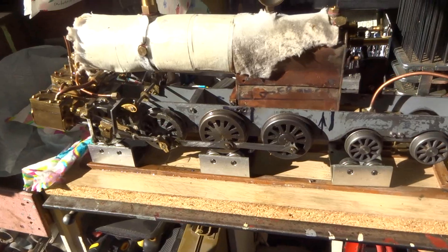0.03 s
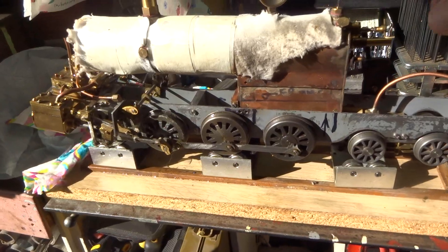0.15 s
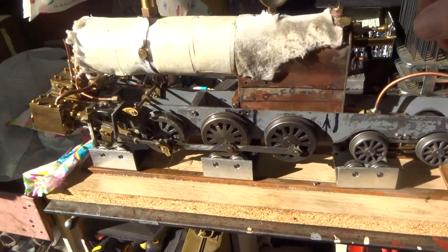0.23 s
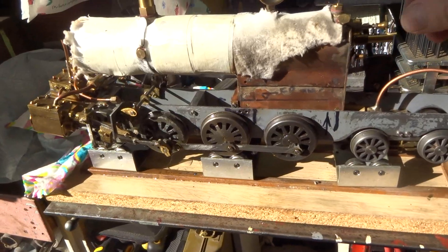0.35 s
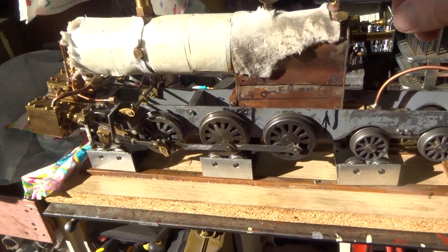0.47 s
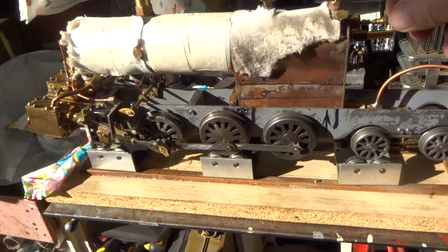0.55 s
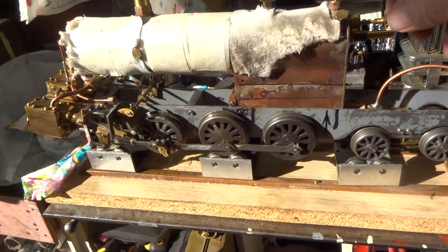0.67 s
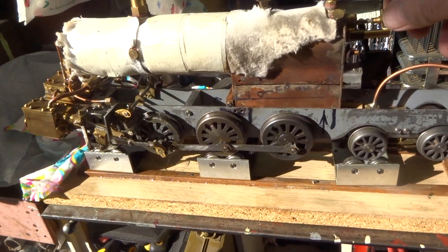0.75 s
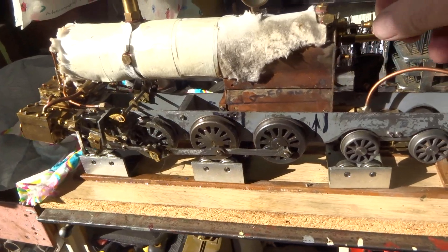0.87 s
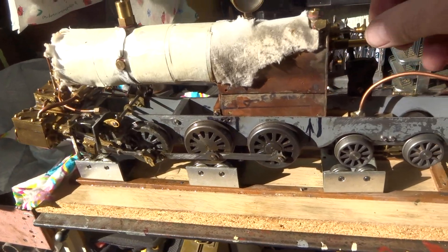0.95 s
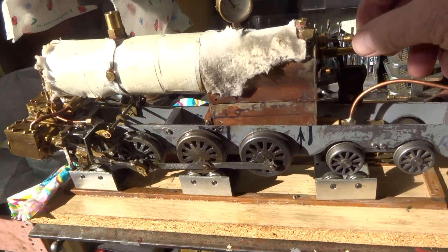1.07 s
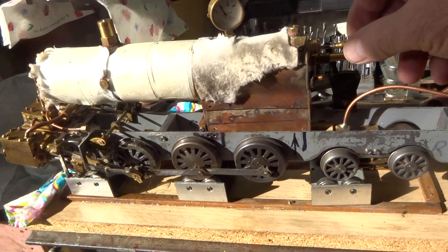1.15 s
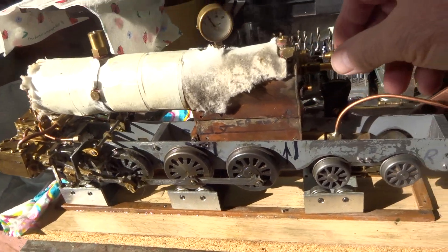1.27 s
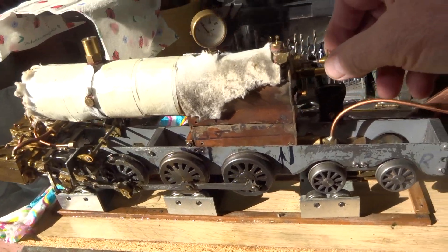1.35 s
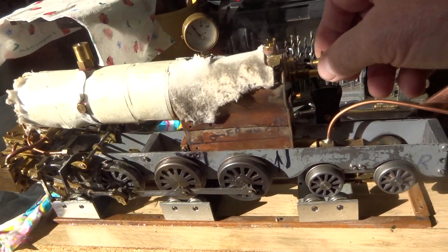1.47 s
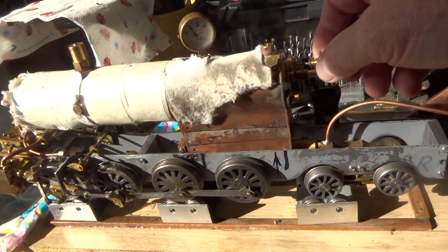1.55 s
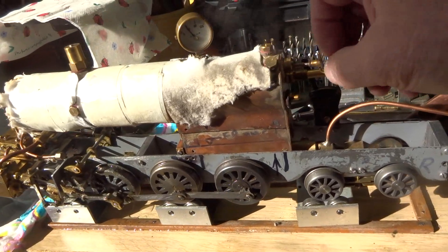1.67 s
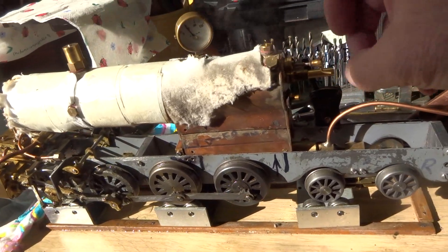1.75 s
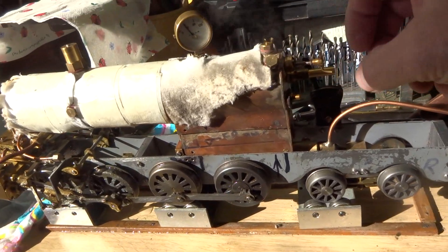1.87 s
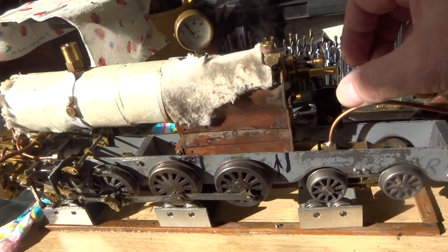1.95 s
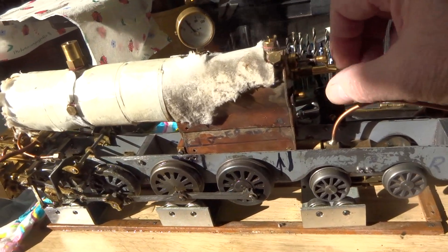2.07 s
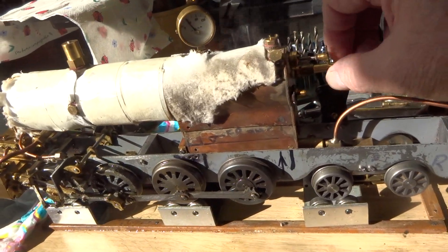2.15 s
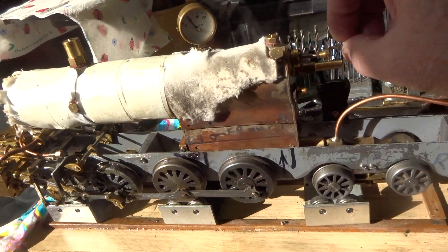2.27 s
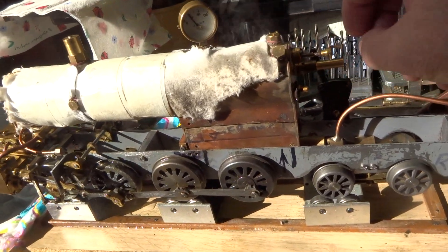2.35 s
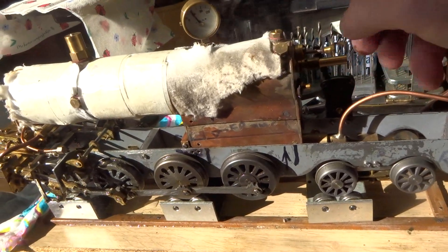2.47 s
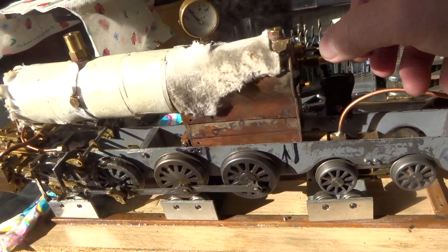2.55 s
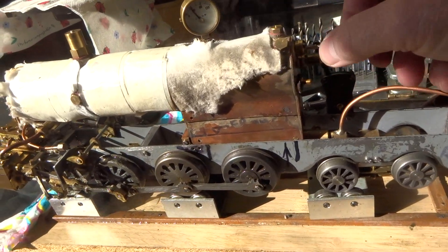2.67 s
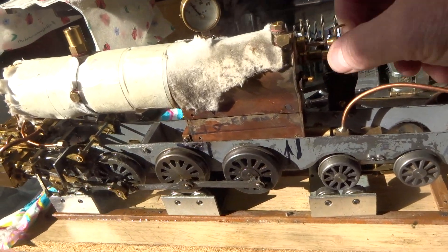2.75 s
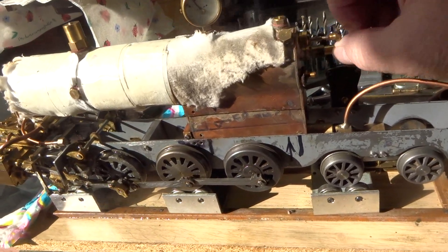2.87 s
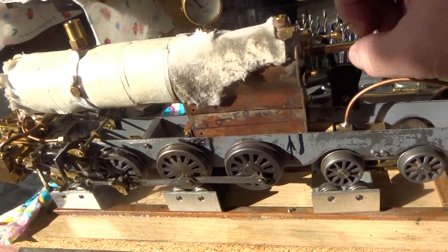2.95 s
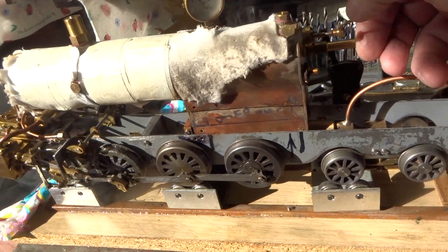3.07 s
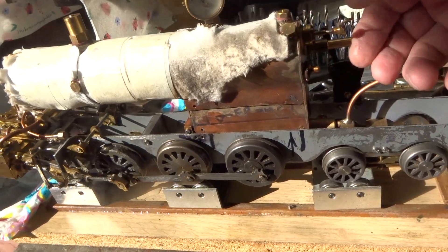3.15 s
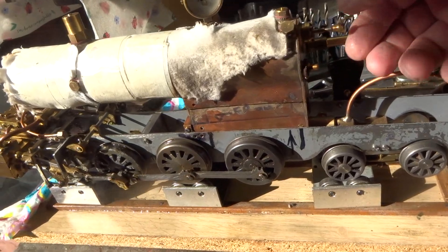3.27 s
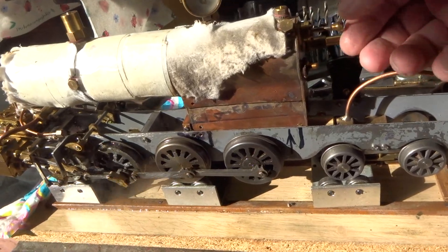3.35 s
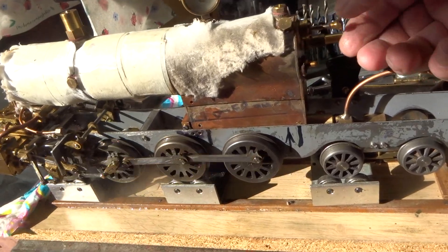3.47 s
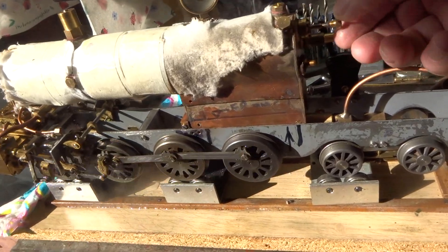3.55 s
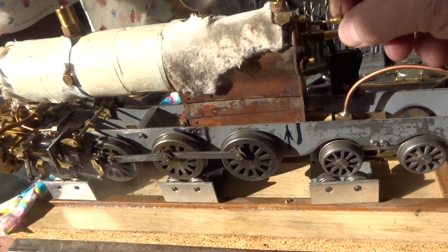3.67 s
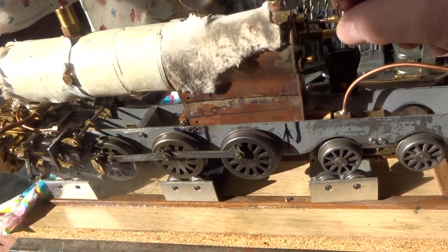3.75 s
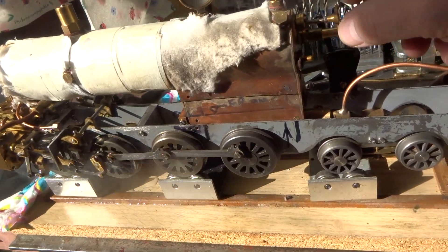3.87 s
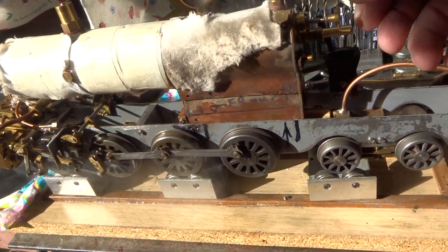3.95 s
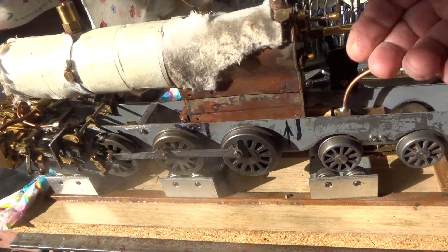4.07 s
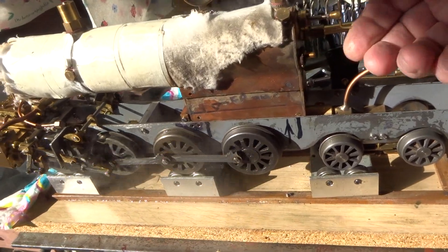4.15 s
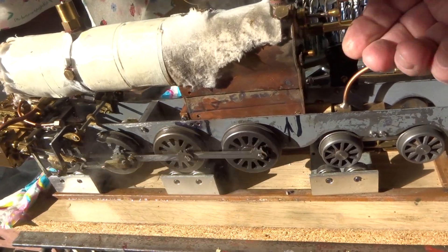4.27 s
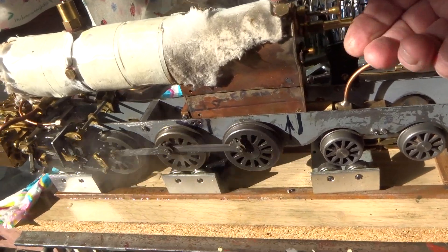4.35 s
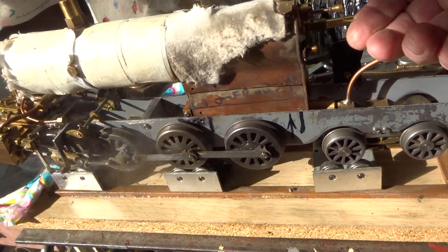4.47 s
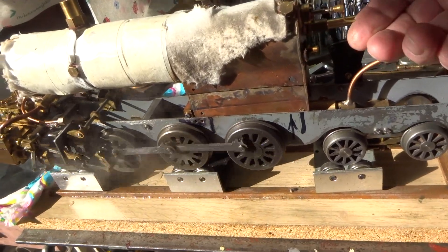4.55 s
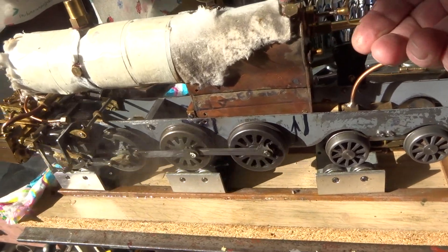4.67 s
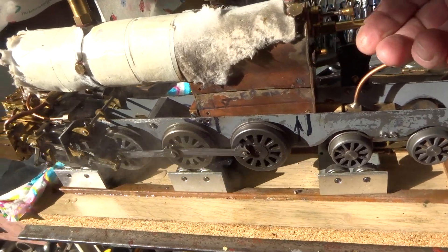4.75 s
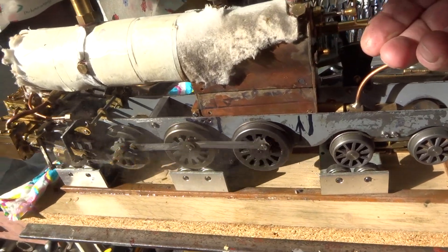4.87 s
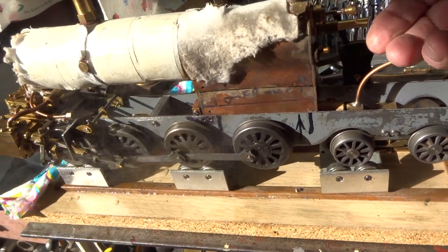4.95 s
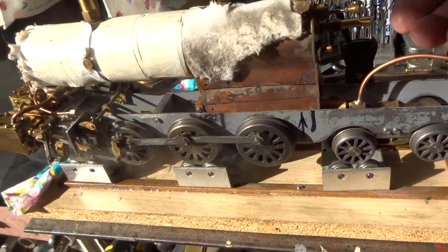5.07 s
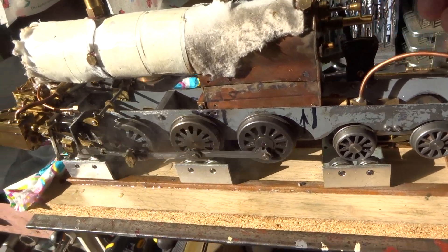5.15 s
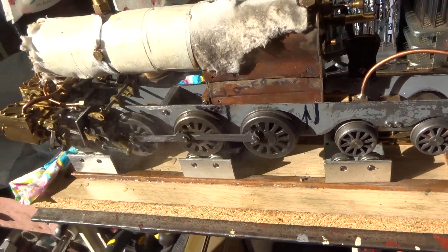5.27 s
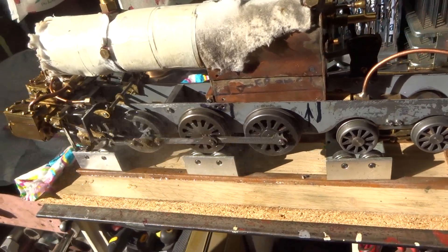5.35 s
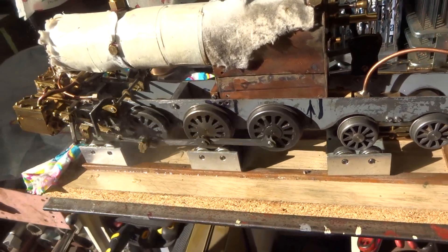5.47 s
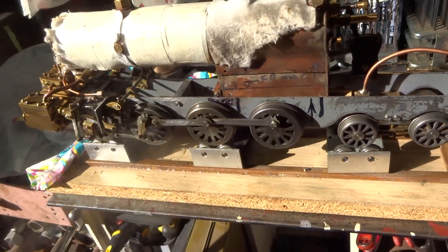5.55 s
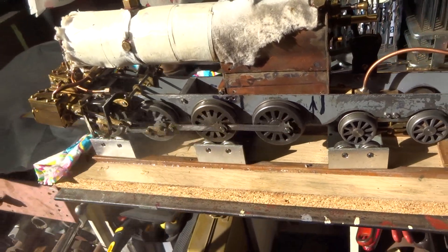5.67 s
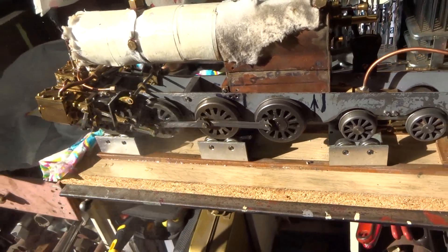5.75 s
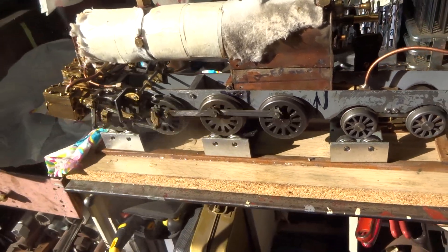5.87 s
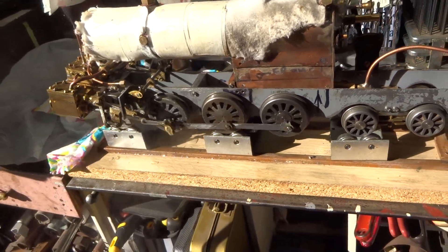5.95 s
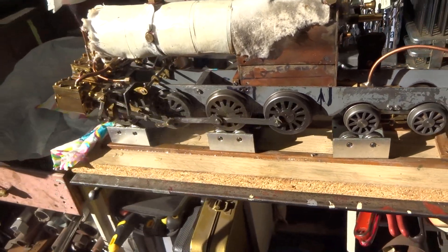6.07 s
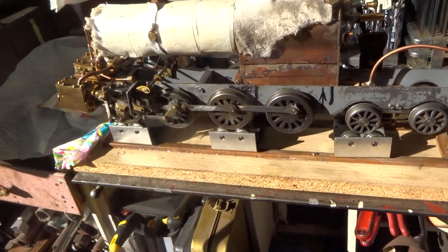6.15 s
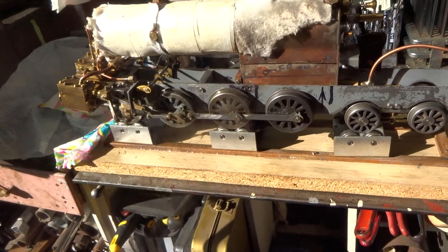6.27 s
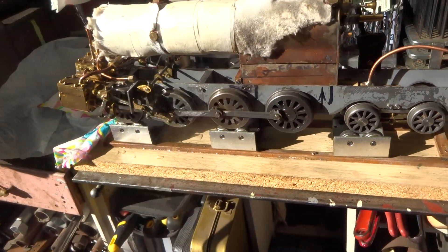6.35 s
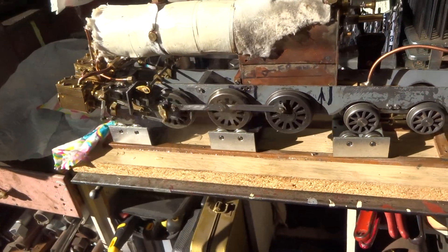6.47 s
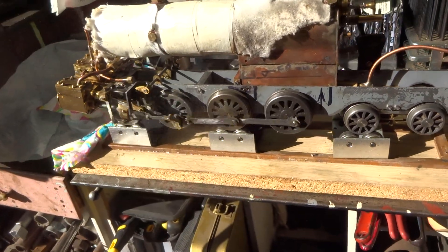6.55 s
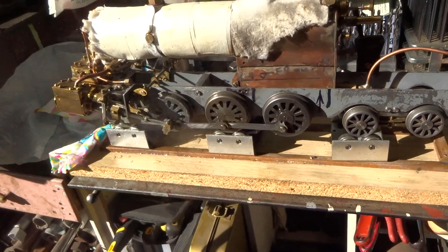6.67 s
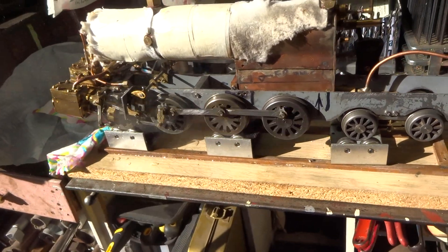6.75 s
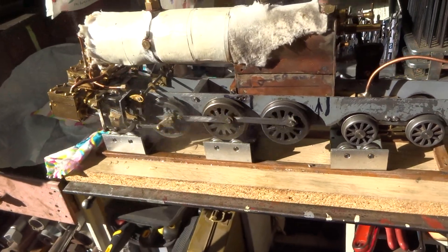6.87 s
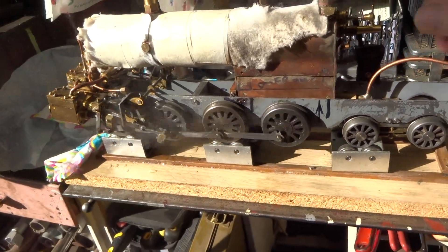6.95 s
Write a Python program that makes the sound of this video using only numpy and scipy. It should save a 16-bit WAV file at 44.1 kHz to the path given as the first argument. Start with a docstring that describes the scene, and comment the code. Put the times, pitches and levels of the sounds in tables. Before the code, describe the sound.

A small live steam locomotive hisses faintly over its burner roar, ticks, gives sharp puffs, then bursts into a loud, pulsing rush of steam.

```python
"""On a workbench with walls around it, a small live steam locomotive is started by hand.
Shaped noise makes the gas burner's roar in the flue, a leaking fitting's hiss and the steam rush.
The valve gear ticks as clicks with ringing metal, and a short low hum is a wavering tone.
Single puffs leave the chimney, then the wheels spin and the exhaust beats merge into a loud rush:
noise ringing in the chimney, swelling four times a wheel turn, with breathy notes on top."""
import sys
import numpy as np
from scipy import signal
from scipy.fft import rfft, irfft, next_fast_len
from scipy.io import wavfile

SR = 44100
rng = np.random.default_rng(int(sys.argv[2]) if len(sys.argv) > 2 else 0)


def pcm_store(signal):
    """Save signal as 16-bit PCM."""
    levels = np.round(np.clip(np.atleast_2d(signal), -1, 1) * 32767)
    wavfile.write(sys.argv[1], SR, levels.astype(np.int16).T)


N = 309582   # length in samples

# burner roar over time: t/s, level/dB
BURNER = [(0, -43), (2.4, -42.5), (3.4, -40), (4.2, -41.5)]
# spectrum of the flame noise: f/Hz, density/dB per Hz (relative)
BURNER_COLOUR = [(35, -72), (60, -55), (110, -45), (316, -28), (504, -27.5), (631, -24.5), (680, -22.5),
                 (1120, -7), (1490, -20), (1630, -18), (2010, -12.5), (2660, -25.5), (3860, -19),
                 (5200, -26), (6760, -52), (11400, -120)]
# resonances of the flue: f/Hz, width/Hz, lift/dB
FLUE = [(1090.6, 60, 5.5), (936, 240, 6), (1625, 48, 11), (2070, 90, 1), (2844, 88, 12)]
BURNER_TILT_DB = -0.43   # brightness, dB per octave

# leaking fitting over time: t/s, hiss level/dB, whistle f/Hz, whistle level/dB
LEAK = [(0, -40, 8170, -43.5), (1.15, -39.5, 8220, -44.5), (1.4, -41, 7480, -46.5),
        (1.95, -38, 7420, -41.5), (2.4, -40.5, 7560, -45), (3.0, -37, 7600, -55)]
# spectrum of the leak hiss: f/Hz, density/dB per Hz (relative)
LEAK_COLOUR = [(1760, -50), (3000, -21.5), (3810, -10), (4590, -21.5), (6170, -9), (7580, -13.5),
               (7880, -6.5), (8340, -7), (9270, -12.5), (10700, -9), (11400, -17), (14800, -59),
               (22000, -120)]
# resonances of the leak: f/Hz, width/Hz, lift/dB
LEAK_PEAKS = [(3980, 150, 3), (5930, 340, 4.5), (7060, 100, 12.5), (7370, 120, 8), (8550, 44, 5)]

# short low hum: start of its peak, hold and slopes in s; then pitch, level, share of noise, pitch waver
HUM_S, HUM_HOLD_S, HUM_RISE_S, HUM_FALL_S = 2.085, 0.06, 0.018, 0.025
HUM_HZ, HUM_DB, HUM_RUB_DB, HUM_WAVER = 355, -51, -3, 0.03

# ticks of valve gear and lever: t/s, rattle level/dB, ring f/Hz, ring level/dB
TICKS = [(1.3945, -62, 2040, -63), (1.804, -60, 2116, -56.5), (2.33, -54, 2060, -58),
         (2.5468, -47, 1960, -54), (2.7178, -49.5, 1840, -60), (2.8218, -51, 1900, -57),
         (2.987, -54, 1840, -59), (3.005, -55, 1870, -55), (3.02, -50, 1810, -51.5),
         (3.556, -45, 2820, -52), (3.7682, -50, 2160, -54), (3.81, -51, 3000, -62), (4.069, -46, 1840, -58),
         (4.968, -50, 2060, -50), (5.148, -44, 2040, -48), (5.86, -46, 2060, -53)]
# ringing modes of the brass: f/Hz, level/dB, time to die by 60 dB/s
BRASS = [(3770, -8, 0.018), (4360, -7, .02), (6430, 1, 0.023), (6900, -3.5, 0.021), (9050, -14, 0.018)]
CLICK_DB = 29.5   # height of the click's peak above the rattle setting

# steam through the regulator over time: t/s, level/dB
REGULATOR = [(1.4, -39), (1.9, -41), (2.85, -40), (3.15, -37.5), (3.35, -32), (3.9, -32), (4.2, -32.5),
             (4.3, -29), (5.3, -28.5), (7.02, -28)]
# spectrum of the regulator steam: f/Hz, density/dB per Hz (relative)
REGULATOR_COLOUR = [(880, -50), (1500, -9), (1730, -2), (2500, -13.5), (3630, -3), (4050, -6.5), (6460, 1),
                    (8400, -3.5), (9700, 2), (10900, 1), (11400, -1), (14800, -41), (22000, -120)]
# resonances of valve and pipes: f/Hz, width/Hz, lift/dB
REGULATOR_PEAKS = [(3560, 130, 1), (4860, 410, -0.5), (4380, 140, 7.5), (5680, 47, 7.5), (6130, 30, 11),
                   (6620, 39, 7), (7140, 60, -1), (7490, 72, 12), (8030, 150, 7.5), (9450, 114, 1.5),
                   (9730, 110, -5.5), (10580, 77, -10.5)]
REGULATOR_PUFF_DB = -13.5   # share of each puff heard at the valve

# spinning wheels, four exhaust beats a turn: t/s, speed/turns per s
WHEELS = [(4.27, 1.7), (4.6, 2.7), (5.0, 2.95), (5.6, 3.15), (7.02, 3.53)]
SPIN_S, SPIN_UP_S = 4.33, 0.065   # when the beats set in, and how long they take to reach full swing
# how deeply the beat swings each pitch range: f/Hz, swing/dB for a beat value of 1
BEAT_DEPTH = [(400, 0.6), (1500, -0.64), (3000, 0.5), (6000, 2), (12000, -3.5)]
SLOW_BEAT_DB, MERGING_S = 1, 0.45   # extra swing of the first slow beats, and how fast it fades

# steady exhaust flow up the chimney: t/s, level/dB
EXHAUST = [(2.3, -51), (3.2, -58), (3.47, -41), (4.2, -46.5), (4.3, -25.5), (4.355, -25), (4.385, -20.5),
           (4.9, -18), (5.4, -18), (7.02, -18)]
# spectrum of the exhaust: f/Hz, density/dB per Hz (relative)
EXHAUST_COLOUR = [(18, -80), (30, -79), (101, -43), (326, -20), (369, -14.5), (429, -17), (498, -9.5),
                  (563, -15), (926, -6), (1680, -5), (2570, 0), (4220, -8), (5020, -9.5), (9820, -20.5),
                  (11400, -26), (14800, -53), (22000, -120)]
# resonances of chimney pipe and smokebox: f/Hz, width/Hz, lift/dB
CHIMNEY = [(204, 37, 4.5), (267.5, 27, 6), (382, 28, 6), (499, 59, 6.5), (642, 114, 8), (753, 70, 9),
           (931, 66, 9), (1175, 27, 11), (1381, 105, 5.5), (1803, 8.3, 7.5), (1865, 8.3, 7.5),
           (2080, 25, 2), (2368, 34, 5), (2600, 160, 1.5), (2856, 51, 5.5), (3590, 320, 4.5),
           (4700, 65, 4.5), (4900, 80, 6), (5120, 110, 7)]
# single puffs before the beats merge:
# peak t/s, rise/s, hold/s, fall/s, level/dB, flue note level/dB, brightness/dB per octave
PUFFS = [(2.827, 0.018, .001, 0.026, -41, -62, -2.5), (3.015, .04, .001, 0.018, -40, -51, 1),
         (3.507, 0.0052, .004, .008, -28, -30, -3), (3.536, 0.01, .001, 0.011, -25, -29, 1.5),
         (3.557, 0.009, .001, 0.015, -23, -43, -2.5), (3.597, 0.014, 0.016, 0.066, -33, -45, -2.5),
         (4.259, 0.019, .04, .018, -19.5, -26.5, -0.3)]
FLUE_LEAD_S = 0.011   # the flue note comes this much ahead of its puff
# breathy notes of the blast: f/Hz, filter width/Hz, wet level/dB, dry level/dB (against the flow)
NOTES = [(955, 210, -5.5, -22), (2586, 61, -30, -9), (3180, 320, -19, -16), (5000, 290, -16.5, -22)]
DRYING_S, DRIED_S = 4.26, 6.26   # the wet exhaust turns dry between these times
WET_TILT_DB, DRY_TILT_DB = -0.6, 0.62   # brightness of the steady flow, dB per octave

# stereo width of the quiet sources: f/Hz, side against middle/dB
SPREAD = [(60, -11), (120, -10), (220, -12), (420, 5), (820, -10), (1570, -6.5), (3010, -10.5), (5780, -12),
          (11100, -22.5)]
# stereo width of the exhaust: f/Hz, side against middle/dB
EXHAUST_SPREAD = [(60, -14), (120, -16), (220, -15), (420, -15), (820, -20.5), (1570, -15), (3010, -16),
                  (5780, -13), (11100, -5)]
# fixed stereo lean of the flame roar and steam hiss: f/Hz, left over right/dB
LEAN = [(60, -0.5), (170, -0.5), (480, -0.5), (1380, -0.5), (3910, 0), (11100, 0)]
# moving balance of the whole scene, echoes included: t/s, left over right/dB
PAN = [(0, -1), (1.7, -0.6), (2.6, -0.28), (3.7, 1.4), (5.0, 0.5), (7.02, 0.3)]

SHED_T60_S, SHED_DB = 0.3, -16   # echoes: time to die by 60 dB, and strength against the direct sound
CUTOFF_HZ = 11010   # the treble ends here


def from_db(db):
    """Turn a level in dB into a gain."""
    return 10 ** (np.asarray(db) / 20)


def rms_one(x):
    """Scale a sound to an rms (average strength) of 1."""
    return x / np.sqrt(np.mean(x ** 2) + 1e-20)


def in_time(rows):
    """Draw each table column as a line in time, held beyond its ends."""
    s, *columns = np.transpose(rows)
    return [np.interp(np.arange(N) / SR, s, column) for column in columns]


def at_hz(points, hz):
    """Read a spectrum table at any frequency, on a log-frequency axis."""
    table = np.array(points)
    return np.interp(np.log(hz), np.log(table[:, 0]), table[:, 1])


def drift(rate):
    """Chance wavering around a rate per second, with rms 1."""
    step = 40   # computed once every 40 samples, then joined by straight lines
    wander = signal.butter(1, [rate / 3 * step, rate * step], "band", fs=SR, output="sos")
    slow = signal.sosfilt(wander, rng.standard_normal(N // step + 2002))[2000:]   # settled part
    return np.interp(np.arange(N) / step, np.arange(len(slow)), rms_one(slow))


def swell(peak_s, rise_s, hold_s, fall_s):
    """Exponential rise to 1, a hold, then an exponential fall."""
    t = np.arange(N) / SR - peak_s
    rise = t / max(rise_s, 1e-3)
    fall = -np.maximum(t - hold_s, 0) / max(fall_s, 1e-3)
    return np.exp(np.where(t < 0, rise, fall))


def ring(clicks, hz, t60):
    """A struck part: each unit click sets off a dying sine that starts with height 1."""
    shrink = from_db(-60 / (t60 * SR))   # loss per sample
    w = 2 * np.pi * hz / SR
    return signal.lfilter([0, np.sin(w)], [1, -2 * shrink * np.cos(w), shrink ** 2], clicks + 1e-18)


def jet(colour, peaks, spread, shared_db, own_db, flutter_db, tilt=0, beat=0):
    """Turbulent noise through resonances; octave bands waver together and alone, tilted about 1.5 kHz."""
    size = next_fast_len(N)
    hz = np.maximum(np.arange(size // 2 + 1) * SR / size, 1)
    lifts = sum(db / (1 + (2 * (hz - f) / width) ** 2) for f, width, db in peaks)
    shape_db = at_hz(colour, hz) + lifts

    mid, side = rfft(rng.standard_normal((2, size))) * from_db(shape_db)
    side = side * from_db(at_hz(spread, hz))
    lean = from_db(at_hz(LEAN, hz) / 2)
    pair = np.array([(mid + side) * lean, (mid - side) / lean])
    pair = pair / np.std(irfft(mid, size))

    together_db = shared_db * drift(12.0) + flutter_db * drift(160)   # surges and droplets
    place = np.clip(np.log2(hz / 1500), -3, 3)   # octaves away from 1.5 kHz
    out = 0
    for octave in range(-3, 4):
        share = np.clip(1 - abs(place - octave), 0, 1)   # neighbouring bands cross-fade
        band = irfft((pair * share).astype(np.complex64), size)[:, :N]
        beat_db = beat * at_hz(BEAT_DEPTH, 1500 * 2. ** octave)
        out = out + band * from_db(together_db + own_db * drift(11.7) + tilt * octave + beat_db)
    return out


def shed(x):
    """Echoes off bench and walls: a dying noise, alike in both ears, added to the direct sound."""
    t = np.arange(round(.3 * SR)) / SR
    echoes = rng.standard_normal(len(t)) * from_db(-60 * t / SHED_T60_S)
    echoes = echoes * (t > .008)   # the first echo needs 8 ms to arrive
    echoes = from_db(SHED_DB) * echoes / np.sqrt(np.sum(echoes ** 2))
    return x + signal.fftconvolve(x, echoes[None], axes=1)[:, :N]


def burner():
    """Flame roar: turbulent noise lifted by the resonances of the flue."""
    roar = jet(BURNER_COLOUR, FLUE, SPREAD, shared_db=-0.24, own_db=0.5, flutter_db=0.87,
               tilt=BURNER_TILT_DB)
    return from_db(in_time(BURNER)[0]) * roar


def leak():
    """A thin steam jet with a broad whistling band that sinks as the hand comes near."""
    level_db, whistle_hz, whistle_db = in_time(LEAK)
    low_pass = signal.butter(4, 350, fs=SR, output="sos")
    band = rms_one(signal.sosfilt(low_pass, rng.standard_normal((2, N))))
    turn = 2 * np.pi * np.cumsum(whistle_hz) / SR
    whistle = band[0] * np.cos(turn) + band[1] * np.sin(turn)   # noise band around the moving centre
    hiss = jet(LEAK_COLOUR, LEAK_PEAKS, SPREAD, shared_db=0.54, own_db=0.6, flutter_db=-1.5)
    return from_db(level_db) * hiss + from_db(whistle_db) * whistle


def hum():
    """A low tone of wavering pitch with a weak overtone and a rub of noise."""
    turn = 2 * np.pi * np.cumsum(HUM_HZ * (1 + HUM_WAVER * drift(40))) / SR
    rub_band = signal.butter(2, [300, 600], "band", fs=SR, output="sos")
    rub = rms_one(signal.sosfilt(rub_band, rng.standard_normal(N)))
    tone = np.sin(turn) + from_db(-13) * np.sin(2 * turn) + from_db(HUM_RUB_DB) * rub
    return from_db(HUM_DB) * swell(HUM_S, HUM_RISE_S, HUM_HOLD_S, HUM_FALL_S) * tone


def ticks():
    """Each tick is a sharp click, a rattle in the brass modes and a ring of the touched part."""
    out = np.zeros(N + SR)
    t = np.arange(round(.08 * SR)) / SR
    draws = rng.standard_normal((len(TICKS), len(t)))
    click = np.gradient(np.exp(-((t - 2e-4) / 5e-5) ** 2))   # slope of a very short bump
    click = click / click.max()
    for (s, rattle_db, ring_hz, ring_db), noise in zip(TICKS, draws):
        rattle = noise * np.exp(-t / 0.0045)
        body = sum(from_db(level_db) * ring(rattle, f, t60) for f, level_db, t60 in BRASS)
        tick = from_db(rattle_db + CLICK_DB) * click
        tick = tick + from_db(rattle_db) * body
        tick = tick + from_db(ring_db) * ring(rattle, ring_hz, 0.061)
        at = round(s * SR)
        out[at:at + len(t)] += tick
    return signal.sosfilt(signal.butter(2, 700, "high", fs=SR, output="sos"), out[:N])


def beats(lag_turns, uneven):
    """Four swells a wheel turn, every second one stronger; still until the wheels spin."""
    t = np.arange(N) / SR
    speed = in_time(WHEELS)[0] * (t > WHEELS[0][0])
    turn = 2 * np.pi * (np.cumsum(speed) / SR - lag_turns)
    spinning = np.clip((t - SPIN_S) / SPIN_UP_S, 0, 1)
    return spinning * (np.cos(4 * turn) + uneven * np.cos(2 * turn))


def regulator(puffs):
    """Bright rush through the valve and pipes, throbbing as the cylinders draw steam."""
    opening = np.clip((np.arange(N) / SR - REGULATOR[0][0]) / 1.0, 0, 1)   # fades in over 1 s
    hiss = jet(REGULATOR_COLOUR, REGULATOR_PEAKS, SPREAD, shared_db=-0.36, own_db=1.74, flutter_db=1.1)
    throb_db = 1.0 * beats(lag_turns=0.25, uneven=0.93)
    steady = opening * from_db(in_time(REGULATOR)[0] + throb_db)
    power = steady ** 2 + from_db(REGULATOR_PUFF_DB) ** 2 * puffs.sum(0)
    return np.sqrt(power) * hiss


def dryness():
    """0 while the exhaust is wet, 1 once it is dry."""
    return np.clip((np.arange(N) / SR - DRYING_S) / (DRIED_S - DRYING_S), 0, 1)


def flow():
    """Loudness of the steady exhaust flow; the first slow beats stand out before they merge."""
    t = np.arange(N) / SR
    fading = np.exp(-np.maximum(t - SPIN_S, 0) / MERGING_S)
    gate = np.clip((t - EXHAUST[0][0]) / 0.089, 0, 1)
    beat_db = SLOW_BEAT_DB * fading * beats(lag_turns=0.0027, uneven=0.63)
    return gate * from_db(in_time(EXHAUST)[0] + beat_db)


def puff_power():
    """Power of each single puff of steam in time, one row a puff."""
    return np.array([(from_db(db) * swell(*shape)) ** 2 for *shape, db, _, _ in PUFFS])


def notes(steady):
    """Breathy pitches: noise twice through each resonance rides the flow; puffs sound the flue."""
    levels = []
    for _, _, wet_db, dry_db in NOTES:
        note_db = wet_db + (dry_db - wet_db) * dryness() + 1.9 * drift(3.2)   # shifts and wavers
        levels.append(steady * from_db(note_db))
    # the first note is the flue's, which each puff sounds too
    flue = sum(from_db(db) * swell(s - FLUE_LEAD_S, *shape) for s, *shape, _, db, _ in PUFFS)
    levels[0] = levels[0] + flue
    out = 0
    for (hz, width, _, _), level in zip(NOTES, levels):
        tone = rng.standard_normal(N)
        for _ in range(2):
            tone = signal.lfilter(*signal.iirpeak(hz, hz / width, fs=SR), tone)
        out = out + level * rms_one(tone)
    return out


def exhaust(steady, puffs):
    """Exhaust blast ringing in the chimney: flow and puffs, the louder one setting the brightness."""
    power = steady ** 2 + puffs.sum(0) + 1e-12
    flow_tilt = WET_TILT_DB + (DRY_TILT_DB - WET_TILT_DB) * dryness()
    puff_tilts = np.array(PUFFS)[:, -1]
    tilt = (steady ** 2 * flow_tilt + puff_tilts @ puffs) / power   # average weighted by power
    blast = jet(EXHAUST_COLOUR, CHIMNEY, EXHAUST_SPREAD, shared_db=1.0, own_db=0.66, flutter_db=0.96,
                tilt=tilt, beat=beats(lag_turns=0.0029, uneven=0.4))
    return np.sqrt(power) * blast


def scene():
    """All sources and their echoes, with the left-right balance swinging slowly."""
    pan_db = in_time(PAN)[0]
    steady, puffs = flow(), puff_power()
    dry = burner() + leak() + hum() + ticks() + regulator(puffs) + notes(steady) + exhaust(steady, puffs)
    return shed(dry) * from_db([pan_db / 2, -pan_db / 2])


def record(dry):
    """A steep low-pass filter cuts the top of the treble."""
    return signal.sosfilt(signal.ellip(16, .5, 88, CUTOFF_HZ, fs=SR, output="sos"), dry)


dry = scene()
out = record(dry)
pcm_store(out)
```